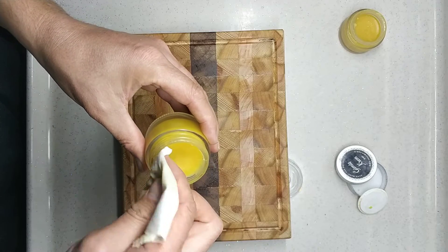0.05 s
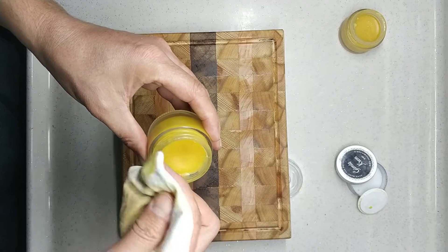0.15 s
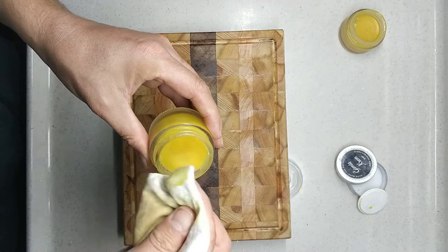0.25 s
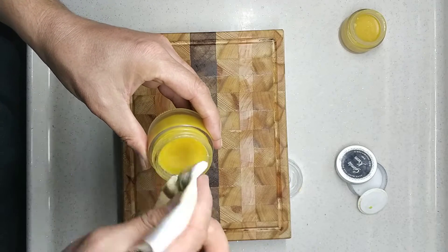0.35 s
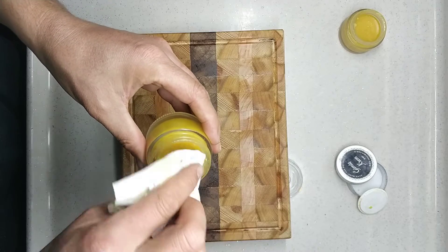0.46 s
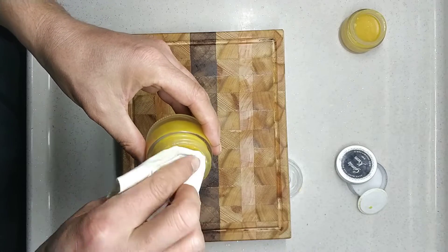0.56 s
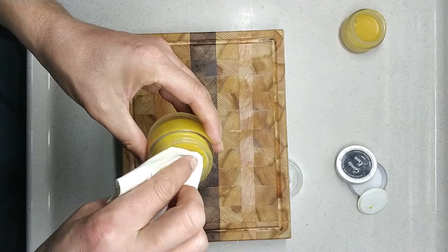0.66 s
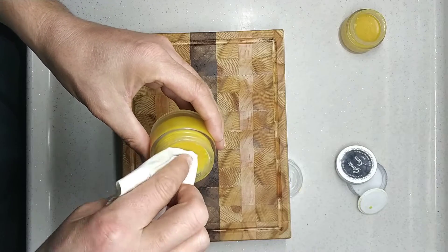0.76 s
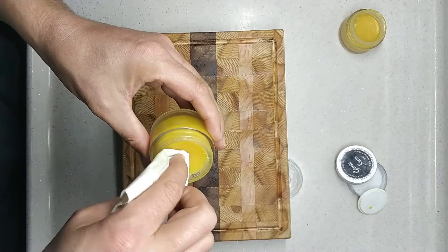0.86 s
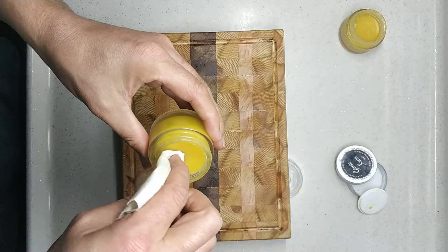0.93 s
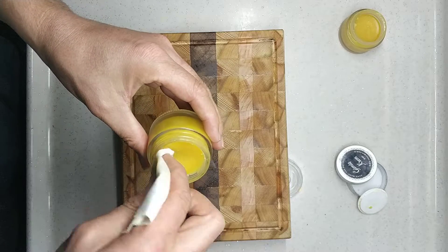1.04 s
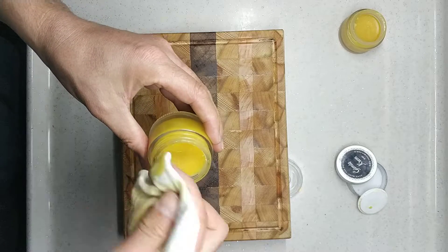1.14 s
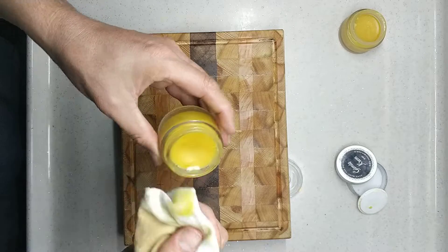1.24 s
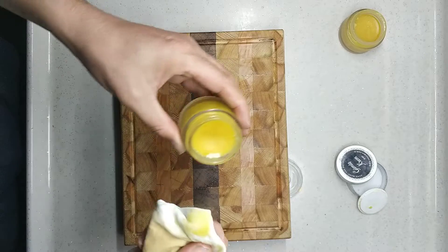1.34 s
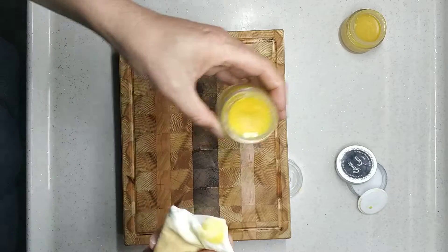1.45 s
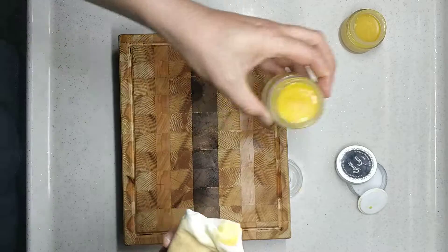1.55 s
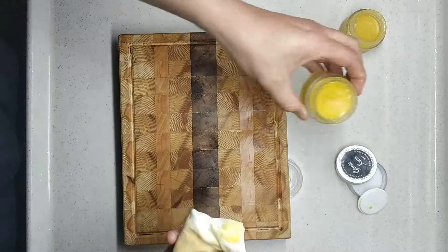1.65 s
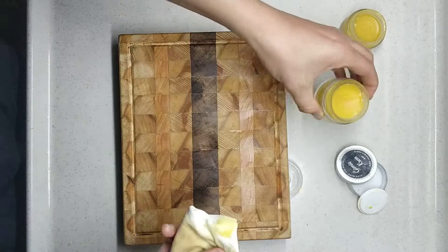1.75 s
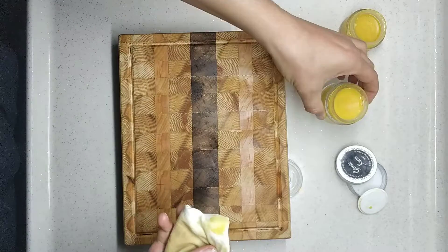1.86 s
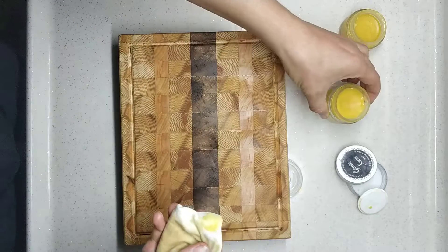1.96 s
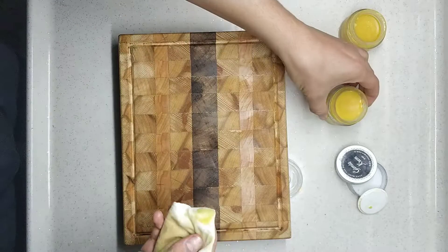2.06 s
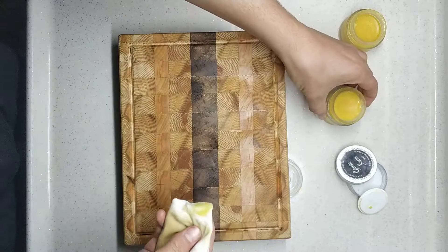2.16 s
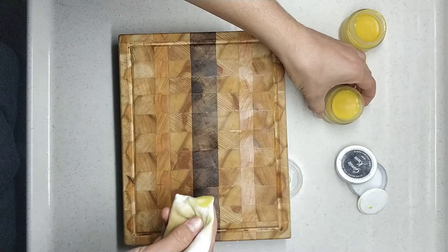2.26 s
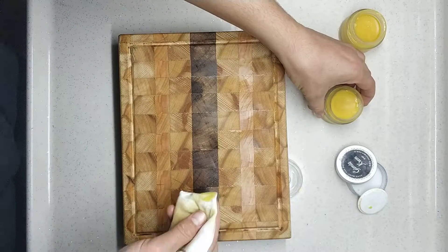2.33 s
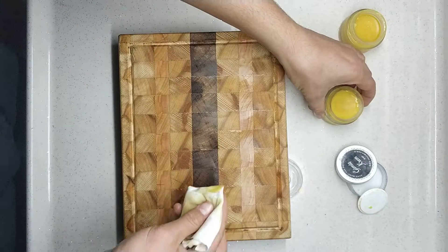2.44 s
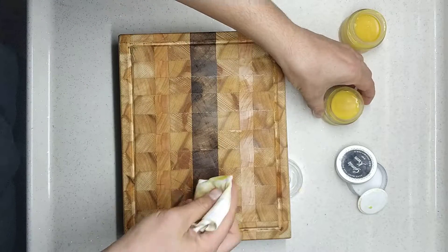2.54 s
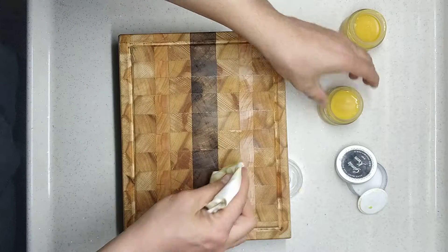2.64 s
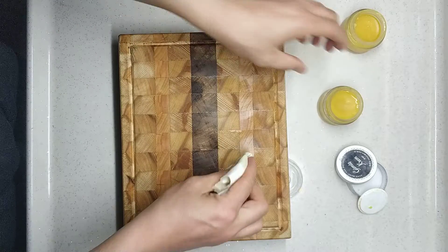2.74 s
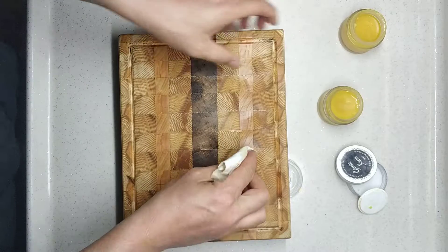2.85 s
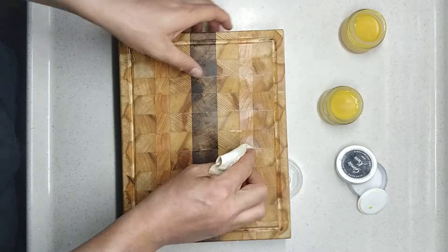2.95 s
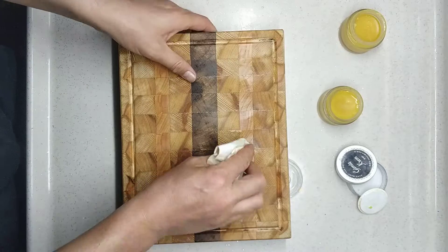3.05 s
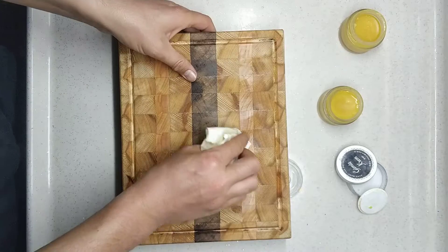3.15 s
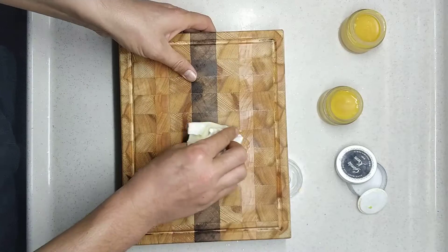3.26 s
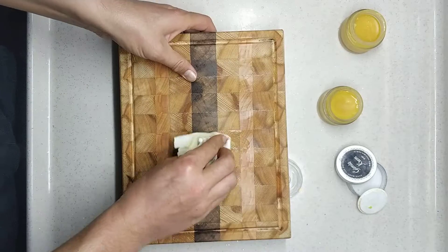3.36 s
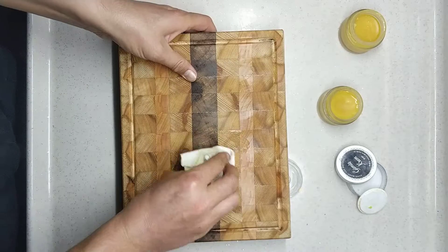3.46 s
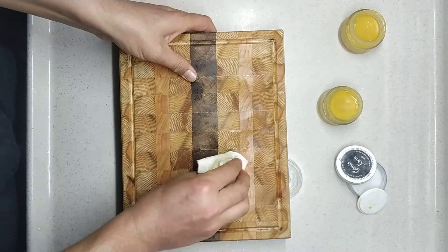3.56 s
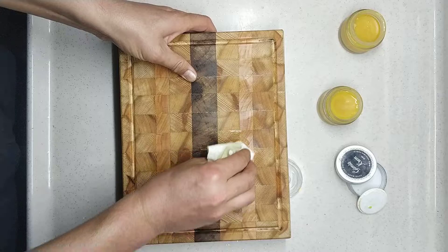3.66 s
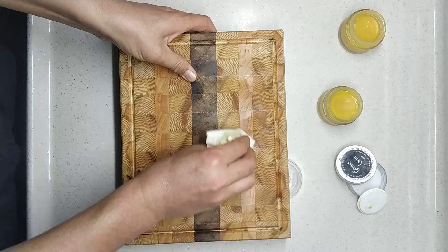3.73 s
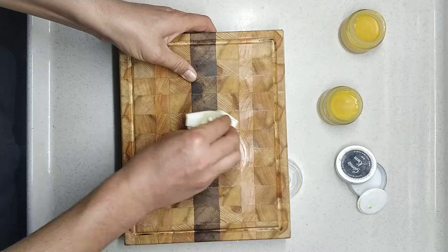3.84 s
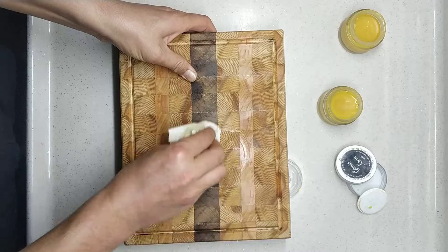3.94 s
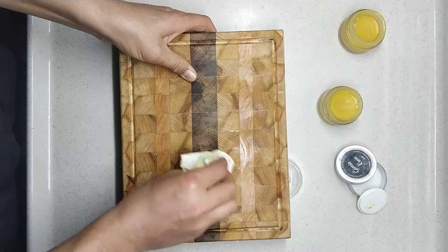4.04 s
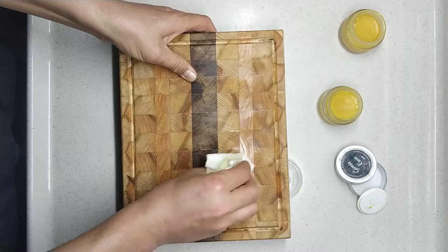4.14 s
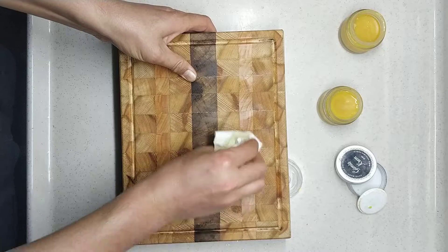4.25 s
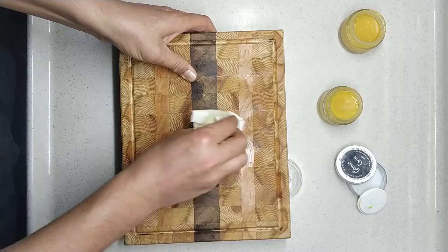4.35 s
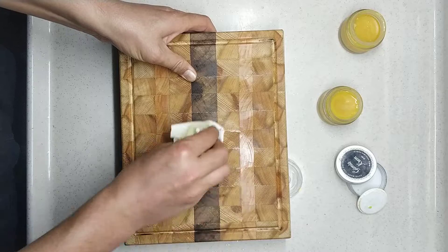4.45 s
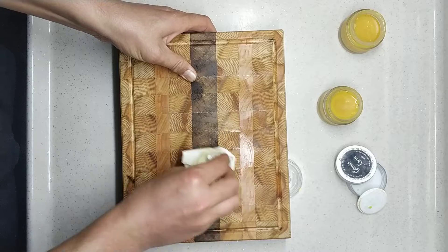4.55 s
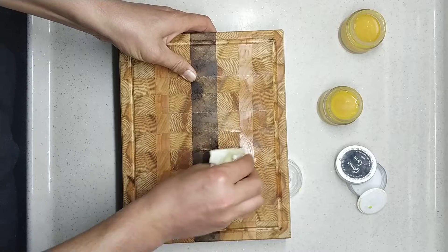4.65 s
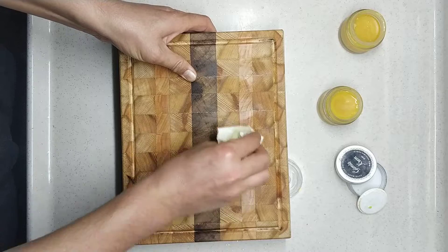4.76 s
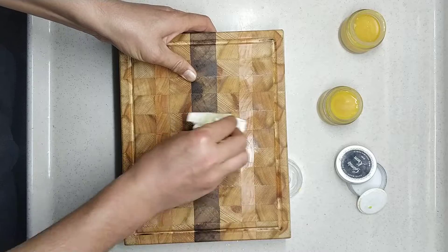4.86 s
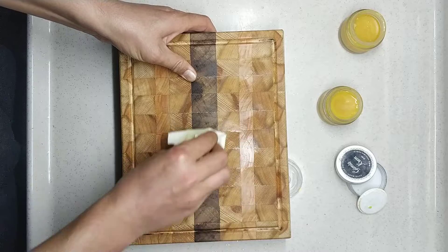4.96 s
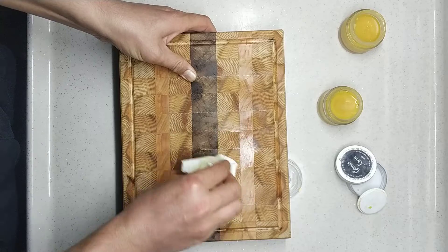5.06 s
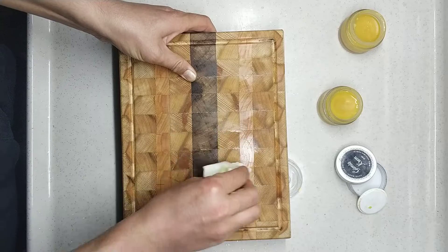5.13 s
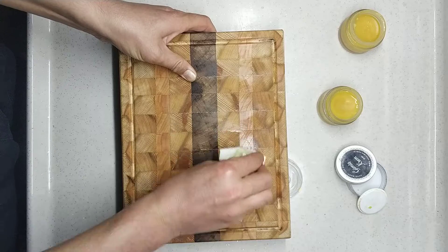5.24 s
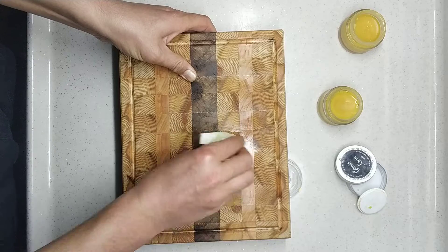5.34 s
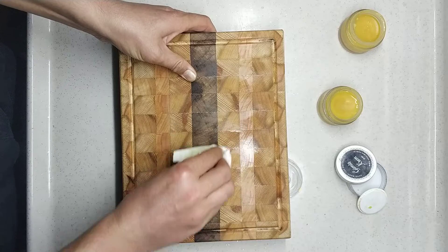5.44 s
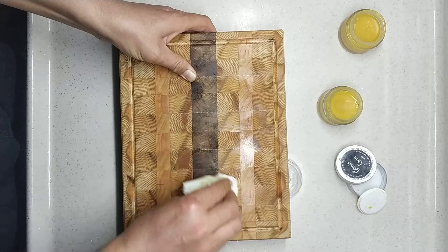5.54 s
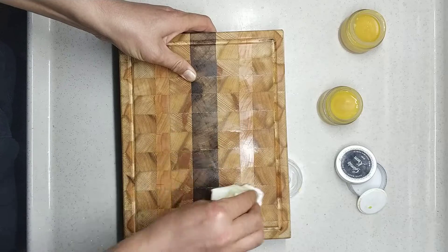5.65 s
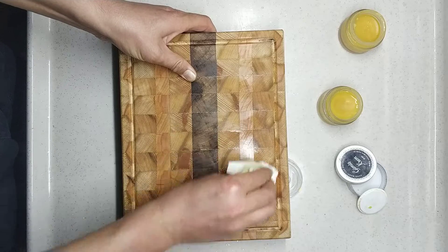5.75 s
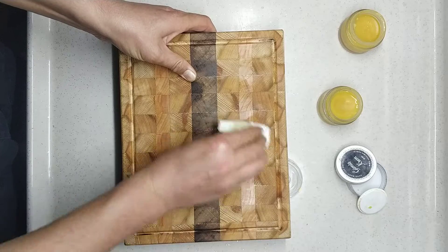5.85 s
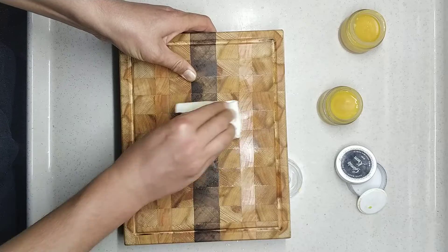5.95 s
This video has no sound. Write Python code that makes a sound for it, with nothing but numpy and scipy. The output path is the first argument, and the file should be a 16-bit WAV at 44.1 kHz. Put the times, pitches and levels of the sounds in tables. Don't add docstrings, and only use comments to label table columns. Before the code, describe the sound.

In a small hard room, a cloth shifts very quietly, then snaps once, bright and dry. A filled glass jar is set on a stone counter with a quick double clunk. A thick wooden board knocks and settles, then cloth strokes hiss quickly to and fro with low judder. A hard wooden knock ends it. Close phone microphone, muffled top treble, nearly mono.

```python
import sys
import numpy as np
from scipy import signal
from scipy.fft import rfft, irfft
from scipy.io import wavfile
from scipy.ndimage import uniform_filter1d

SR = 44100
rng = np.random.default_rng(int(sys.argv[2]) if len(sys.argv) > 2 else 0)


def master(y):
    cut = np.clip(np.atleast_2d(y).T, -1, 1)
    pcm = np.round(cut * 32767)
    wavfile.write(sys.argv[1], SR, pcm.astype(np.int16))


def to_linear_factor(level_db):
    exponent = np.asarray(level_db, float) / 20
    return 10 ** exponent


N = 264600
TIME = np.arange(N) / SR
SLOW = TIME[::64]


def colour(x, points):
    hz, db = np.transpose(points)
    f = np.maximum(np.fft.rfftfreq(x.shape[-1], 1 / SR), 1)
    gain = to_linear_factor(np.interp(np.log(f), np.log(hz), db, left=-90, right=-90))
    return irfft(rfft(x) * gain, x.shape[-1])


def unit(x):
    return x / np.sqrt(np.mean(x ** 2))


def peaks(x, table):
    out = 0
    for k, (hz, width, db) in enumerate(table):
        b, a = signal.iirpeak(hz, hz / width, SR)
        out = out + (-1) ** k * to_linear_factor(db) * signal.lfilter(b, a, x)
    return out


def walk(rate):
    k = int(SR / rate)
    steps = np.repeat(rng.standard_normal(N // k + 1), k)
    return unit(uniform_filter1d(uniform_filter1d(steps, k), k)[:N])


def catches(rate, spread_db):
    on = rng.random(N) < rate / SR
    return unit(on * rng.standard_normal(N) * to_linear_factor(spread_db * rng.exponential(size=N)))


# start in seconds, length in seconds,
# fibre hiss in dB, brightness in dB, board hum in dB.
HANDLING = [(-.1, 0.5, -80.5, -7, -70.5), (.38, .13, -75.5, 1.5, -75.5), (0.567, 0.12, -72, -18, -72),
            (1.01, 0.18, -78, -2.5, -77), (1.244, 0.4, -75.5, -13, -77), (1.55, 0.18, -68.5, -12, -76),
            (1.797, .14, -77.5, -3, -82.5), (2.153, 0.22, -78.5, -15, -76.5),
            (2.543, 0.31, -68.5, -9.5, -63.5), (2.787, 0.24, -73.5, -8, -67.5),
            (2.985, 0.19, -71, -16, -68.5), (3.168, 0.45, -65.5, -2, -68)]
# start in seconds, length in seconds, fibre hiss in dB,
# brightness in dB, board hum in dB.
STROKES = [(3.559, 0.21, -67.5, -11.5, -65), (3.737, 0.21, -60.5, -7.5, -68.5),
           (3.912, 0.29, -58.5, -0.5, -67), (4.282, 0.29, -61, -3, -67.5), (4.444, 0.26, -59.5, -4.5, -66),
           (4.516, 0.088, -61.5, 2.5, -79), (4.613, 0.27, -68, 4, -76), (4.818, 0.21, -59.5, -3.5, -66),
           (4.967, 0.16, -60, -3.5, -72), (5.101, 0.23, -61.5, 0, -66.5), (5.264, 0.15, -65.5, -11, -66.5),
           (5.365, 0.19, -61.5, -0.5, -65.5), (5.484, 0.23, -60, 0, -70.5), (5.736, 0.2, -58, 1, -72.5),
           (5.887, 0.14, -62.5, 4.5, -68)]
START, LENGTH, HISS_DB, BRIGHT_DB, HUM_DB = np.transpose(HANDLING + STROKES)
CONTACT_S, ROUNDNESS = 3.6, 0.7


def swells(db, peak, idle_db, contact_db):
    u = np.clip((SLOW - START[:, None]) / LENGTH[:, None], 0, 1)
    u = u ** (np.log(.5) / np.log(peak))
    shape = np.abs(np.sin(np.pi * u)) ** (2 * ROUNDNESS) * (u < 1)
    power = np.sum(to_linear_factor(2 * db)[:, None] * shape, axis=0)
    touch = np.clip((SLOW - CONTACT_S) / 0.13, 0, 1)
    power = power + to_linear_factor(2 * idle_db) + touch * to_linear_factor(2 * contact_db)
    return np.interp(TIME, SLOW, np.sqrt(power))


def moving_echoes(x, places, ms, depth_db):
    t = TIME[:SR // 20]
    out, power = 0, 0
    for _ in range(places):
        weight = to_linear_factor(depth_db * walk(5))
        echoes = rng.standard_normal(len(t)) * np.exp(-t * 1000 / ms)
        out = out + weight * unit(signal.fftconvolve(x, echoes[None], axes=1)[:, :N])
        power = power + weight ** 2
        x = np.roll(x, SR // 2, axis=1)
    return out / np.sqrt(power)


def patchy(x, depth_db, rate):
    edges = 1200 * 2 ** np.arange(0, 3.4, 1 / 3)
    out = 0
    for lo, hi in zip(edges, edges[1:]):
        out = out + colour(x, [(lo, 0), (hi, 0)]) * to_linear_factor(depth_db * walk(rate))
    return out


# frequency in Hz, level in dB per Hz.
FIBRES = [(1350, -11.5), (2300, -6.5), (2440, -10), (3180, 2), (3740, -2), (4840, -1), (6860, -3),
          (9240, 2), (9920, -3.5), (10800, -26), (14000, -46), (22000, -120)]


def fibre_hiss():
    low = swells(HISS_DB, peak=0.51, idle_db=-80.5, contact_db=-66)
    high = swells(HISS_DB + BRIGHT_DB, peak=0.51, idle_db=-80.5, contact_db=-66)
    slips = np.array([catches(9000, spread_db=2.5), catches(7600, spread_db=3.0)])
    fibres = moving_echoes(colour(slips, FIBRES), 4, ms=12., depth_db=6.)
    fibres = patchy(fibres, depth_db=1.2, rate=14)
    split = signal.butter(4, 6500, fs=SR, output="sos")
    dull = signal.sosfiltfilt(split, fibres)
    bright = unit(fibres - dull) * high * to_linear_factor(1.56 * walk(25))
    return unit(dull) * low * to_linear_factor(1.23 * walk(32)) + bright


# frequency in Hz, width in Hz, level in dB.
HUM = [(572, 23, -19), (670, 52, 8), (920, 39, -3.5), (1600, 25, 6), (2050, 92, 3), (2280, 43, -2.5),
       (3190, 260, 0.5), (4700, 100, -7.5)]


def board_hum():
    grain = catches(5000, spread_db=0.0)
    modes = sum(peaks(grain, [mode]) * to_linear_factor(3 * walk(8)) for mode in HUM)
    broad = colour(grain, [(350, -2.0), (500, -3.5), (2400, -8.5), (3000, -10)])
    hum = unit(unit(modes) + to_linear_factor(1) * unit(broad))
    return hum * swells(HUM_DB, peak=0.34, idle_db=-81, contact_db=-75.5)


# start in seconds, level in dB, hold in seconds, t60 in seconds.
LURCHES = [(-.02, -58, 0.053, 0.53), (.1, -62.5, 0.028, 0.46), (1.2, -78.5, 0.21, .5),
           (1.908, -67, .03, 0.36), (2.712, -70, 0.044, 0.47), (2.914, -67, 0.031, 0.9),
           (3.142, -62.5, 0.066, .8), (3.214, -62.5, .06, .5), (3.5, -54.5, 0.084, 0.18),
           (3.628, -64.5, 0.044, .3), (3.833, -64, 0.028, 0.34), (3.965, -64, .08, 0.33),
           (4.266, -66.5, .15, 0.55), (4.577, -53.5, 0.053, .4), (4.67, -56.5, 0.055, 0.48),
           (4.81, -66.5, 0.045, 0.093), (5.098, -65.5, 0.087, 0.34), (5.32, -63.5, 0.032, 0.72)]


def lurches():
    s, db, hold, t60 = np.transpose(LURCHES)[:, :, None]
    age = SLOW - s
    rise = np.clip(age / 0.013, 0, 1)
    shape = rise * to_linear_factor(db - 60 * np.maximum(age - hold, 0) / t60)
    power = np.interp(TIME, SLOW, np.sum(shape ** 2, axis=0))
    return np.sqrt(power + to_linear_factor(2 * (-82 + 4.2 * walk(5.4))))


# frequency in Hz, width in Hz, level in dB.
FEET = [(164.8, 32, 1), (212, 29.3, 4.5), (241.4, 70.5, -2)]


def judder():
    slips = colour(catches(900, spread_db=1.5), [(40, -33), (90, -16.0), (140, 0), (300, -0.5), (420, -19)])
    return unit(peaks(slips, FEET)) * lurches()


# start in seconds,
# length in seconds, frequency in Hz, level in dB.
STREAKS = [(0, 0.59, 2070, -77), (.092, .11, 670, -75), (0.257, .069, 3200, -71.5),
           (1.243, 0.17, 2050, -76.5), (2.578, 0.32, 2050, -64.5), (2.849, .35, 2050, -70),
           (3.723, 0.23, 3080, -69.5), (3.885, 0.07, 1600, -70.5), (3.95, .19, 2130, -72),
           (4.298, 0.23, 668, -73), (4.349, 0.13, 2050, -72), (4.496, 0.27, 3060, -72),
           (4.821, 0.18, 673, -67), (4.844, 0.15, 1600, -67), (4.874, .18, 2280, -79),
           (5.037, 0.11, 670, -69), (5.105, 0.44, 2050, -67), (5.219, 0.23, 531, -69.5),
           (5.4, 0.18, 4700, -65), (2.577, 0.027, 6100, -65.5), (5.746, 0.13, 1600, -68.5)]
# start in seconds, length in seconds, frequency in Hz,
# width in Hz, level in dB.
SCUFFS = [
    (2.659, .18, 3490, 890, -64),
    (5.561, 0.1, 3200, 400, -65),
]


def streaks():
    out = np.zeros(N + SR)
    mode_hz, mode_width = np.transpose(HUM)[:2]
    sung = [(s, length, hz, 1.78 * np.interp(hz, mode_hz, mode_width), db) for s, length, hz, db in STREAKS]
    for s, length, hz, width, db in sung + SCUFFS:
        noise = rng.standard_normal(SR)[:int(length * SR)]
        mode = [(hz, width, 0)]
        tone = unit(peaks(peaks(noise, mode), mode))
        out[int(s * SR):][:len(tone)] += to_linear_factor(db) * tone * np.hanning(len(tone)) ** .5
    return out[:N]


def rubbing():
    board = board_hum() + judder() + streaks()
    return fibre_hiss() + np.array([board, 0 * board])


# frequency in Hz, level in dB per Hz.
AIR = [(41, -66), (70, -30), (140, -26), (238, -4.5), (281, -3.5), (519, -4), (682, -12.5), (807, -7.5),
       (1580, -13.5), (4180, -14), (7080, -22.5), (9310, -15.5), (10800, -46), (14000, -61), (22000, -120)]
AIR_DB = -69


def air():
    return unit(colour(rng.standard_normal((2, N)), AIR)) * to_linear_factor(AIR_DB - 2.5 + 0.35 * walk(2.3))


def click(points):
    hz, db = np.transpose(points)
    f = np.maximum(np.fft.rfftfreq(2048, 1 / SR), 20)
    cepstrum = irfft(np.interp(np.log(f), np.log(hz), db) * np.log(10) / 20)
    cepstrum[1:1024] *= 2
    pulse = irfft(np.exp(rfft(cepstrum[:1025], 2048)))
    return pulse / np.abs(pulse).max()


def knocks(events, crack, modes, gain_db):
    out, t = np.zeros((2, N + SR)), TIME[:SR // 4]
    hz, db, t60 = np.transpose(modes)[:, :, None]
    vary = rng.standard_normal((len(events), len(modes), 1))
    for (s, peak_db, soft_db, direct_db), v in zip(events, vary):
        decay = to_linear_factor(db + 1.5 * v - 60 * t / t60)
        blow = np.sum(decay * np.sin(2 * np.pi * hz * t), axis=0)
        blow[:2048] += click([(f, d - soft_db * np.log2(f / 1000)) for f, d in crack])
        at = int(s * SR)
        out[:, at:at + len(t)] += to_linear_factor(peak_db + gain_db + np.array([[0], [direct_db]])) * blow
    return out[:, :N]


def long_rings(events, modes):
    out, t = np.zeros(N + SR), TIME[:SR]
    hz, db, t60 = np.transpose(modes)[:, :, None]
    vary = rng.standard_normal((len(events), 2, len(modes), 1))
    for (s, peak_db, *_), (size, phase) in zip(events, vary):
        decay = to_linear_factor(db + 2 * size - 60 * t / t60)
        ring = np.sum(decay * np.sin(2 * np.pi * hz * t + 3 * phase), axis=0)
        out[int(s * SR):][:SR] += to_linear_factor(peak_db + 21.0) * ring * (1 - np.exp(-t / 0.0029))
    return np.array([out[:N], 0 * TIME])


# frequency in Hz, t60 in seconds.
ROOM_T60 = [(150, 0.31), (400, 0.6), (1000, 0.53), (2800, 0.52), (7000, 0.57), (10000, 0.43)]
NEAR_MS, FAR_MS, FAR_DB = 13, 16.5, -4.5


def room(t60_scale):
    t = TIME[:SR]
    ms = t * 1000
    hz, t60 = np.transpose(ROOM_T60)
    tail = 0
    for centre in 100 * 2 ** np.arange(0, 7.5, .5):
        edges = [centre / 2 ** .25, centre * 2 ** .25]
        sos = signal.butter(2, edges, "band", fs=SR, output="sos")
        band = signal.sosfilt(sos, rng.standard_normal((2, SR)))
        band_t60 = t60_scale * np.interp(np.log(centre), np.log(hz), t60)
        tail = tail + band * to_linear_factor(-60 * t / band_t60)
    near = np.clip(ms / 0.46, 0, 1) / (1 + (ms / NEAR_MS) ** 8)
    far = to_linear_factor(FAR_DB) / (1 + np.exp(np.clip(FAR_MS - ms, -30, 30)))
    response = tail * (near + far)
    return response / np.sqrt(np.sum(response[0] ** 2))


def in_room(blows, t60_scale):
    wet = signal.fftconvolve(blows[:1], room(t60_scale), axes=1)[:, :N]
    wet = signal.sosfilt(signal.butter(4, 132, "high", fs=SR, output="sos"), wet)
    both = wet + np.array([blows[1], 0 * blows[1]])
    return signal.sosfilt(signal.butter(3, 120, "high", fs=SR, output="sos"), both)


# start in seconds, peak in dB, softness in dB per octave, direct share in dB.
SNAPS = [
    (0.5994, -77, 1.1, -16),
    (1.1122, -37.5, 0.6, -17),
    (1.5913, -70, 6, -16),
    (3.058, -66, -3, -15),
]
# frequency in Hz, level in dB per Hz.
SNAP_CRACK = [(880, -37), (1500, -23), (1710, -31), (1770, -30), (2270, -18.5), (7140, -7), (8350, -1.5),
              (9610, -3), (10800, -26), (14000, -50), (22000, -120)]
# frequency in Hz, level in dB, t60 in seconds.
SNAP_MODES = [(3200, -18, 0.0072)]


def cloth_snaps():
    return in_room(knocks(SNAPS, SNAP_CRACK, SNAP_MODES, gain_db=13), 0.59)


# start in seconds, peak in dB, softness in dB per octave, direct share in dB.
JAR_HITS = [
    (2.308, -23.5, 1, -14),
    (2.442, -31, -0.46, -33),
    (2.448, -36, 0.37, 2),
    (2.454, -24, -0.46, -28),
]
# frequency in Hz, level in dB per Hz.
JAR_CRACK = [(76, -41), (150, -1.5), (290, -30), (380, -5), (700, -4.5), (914, -0.5), (1080, -5.5),
             (1300, -5), (2030, 1), (2700, -6.5), (3450, -11), (3900, -25), (5300, -28.5), (6500, -36.5),
             (11000, -78)]
# frequency in Hz, level in dB, t60 in seconds.
JAR_MODES = [(390, -21.5, 0.031), (727, -24, 0.056), (930, -14, 0.03), (1320, -17, 0.039),
             (1610, -15.5, 0.066), (1895, -17.5, 0.045)]
# frequency in Hz, level in dB, t60 in seconds.
JAR_RINGS = [(369, -43.5, 0.42), (402, -43.5, 0.28), (525, -49, 0.64), (703, -38.5, 0.45), (921, -29.5, 0.2),
             (1302, -38, 0.21), (1573, -40, 0.13), (1843, -40, .2), (1993, -36, 0.21), (2090, -39, 0.17),
             (2215, -33, 0.17)]


def jar_bounce():
    jar = knocks(JAR_HITS, JAR_CRACK, JAR_MODES, gain_db=7)
    return in_room(jar, 0.85) + long_rings(JAR_HITS, JAR_RINGS)


# start in seconds, peak in dB, softness in dB per octave, direct share in dB.
TAPS = [
    (3.149, -48.5, 0.5, 0),
    (3.299, -62, .4, -2),
    (5.983, -36, .4, -11),
    (5.989, -22, .4, -2),
]
# frequency in Hz, level in dB per Hz.
TAP_CRACK = [(150, -30), (400, -17.5), (650, 6), (850, -25), (1400, -20), (8000, -46)]
# frequency in Hz, level in dB, t60 in seconds.
TAP_MODES = [(585, -19, .04), (670, -13, 0.021)]
# start in seconds, peak in dB, softness in dB per octave, direct share in dB.
BOARD_HITS = [
    (3.393, -24, 0.7, -11.5),
    (3.494, -39, 3.5, -4),
    (3.543, -52.5, 4.5, 4),
    (5.9893, -18, -0.5, -18),
]
# frequency in Hz, level in dB per Hz.
BOARD_CRACK = [(76, -65.5), (140, -28.5), (215, 4), (350, -25), (450, -7), (600, -2), (690, -0.5),
               (950, -7), (1110, -22), (1300, -9), (1500, -18.5), (2330, -12), (7050, -22), (11000, -45.5)]
# frequency in Hz, level in dB, t60 in seconds.
BOARD_MODES = [(160, -38, .08), (205, -38, 0.065), (483, -30.5, 0.075), (558, -25.5, 0.071),
               (684, -17.5, 0.039), (1320, -26.5, 0.03), (2270, -57, 0.077)]
# frequency in Hz, level in dB, t60 in seconds.
BOARD_RINGS = [(163.2, -40, 0.47), (204.2, -32, 0.35), (471, -42.5, 0.31), (547, -36.5, 0.29),
               (688, -33.5, 0.22), (747, -47, 0.18), (856, -36.5, 0.14)]


def board_knocks():
    board = knocks(BOARD_HITS, BOARD_CRACK, BOARD_MODES, gain_db=10.0)
    taps = knocks(TAPS, TAP_CRACK, TAP_MODES, gain_db=-2.0)
    return in_room(board + taps, 0.68) + long_rings(BOARD_HITS, BOARD_RINGS)


# low edge in Hz, high edge in Hz, share of time from 0 to 1,
# side minus mid in dB.
WIDTH = [(4160, 4140, .07, -6), (5020, 5600, .08, -12), (5570, 6200, .2, -8.5), (6100, 6900, 0, 5),
         (7020, 7600, .35, -3.5), (7600, 8300, 0.3, -5.5), (8030, 9240, 0.3, -6), (9000, 9800, 0.5, -9),
         (9800, 8700, 0, -8)]
FRAME, GRID = 1024, 496


def flicker(side):
    out, frames = 0, N // FRAME + 2
    luck = rng.random((len(WIDTH), frames)) + .5 * (rng.random(frames) - .5)
    for (lo, hi, share, db), now, above in zip(WIDTH, luck, np.roll(luck, -1, axis=0)):
        on = np.minimum(now, above + .12) < share
        gate = uniform_filter1d(np.repeat(1. * on, FRAME), FRAME // 2)[FRAME - GRID:][:N]
        out = out + gate * colour(side, [(lo, db), (hi, db)])
    return out


def scene():
    near = rubbing() + cloth_snaps() + jar_bounce() + board_knocks()
    loud = uniform_filter1d(near[0] ** 2, SR // 8) / to_linear_factor(2 * AIR_DB)
    mid, side = near + air() * (1 + np.abs(loud)) ** -.2
    side = flicker(side)
    return np.array([mid + side, mid - side])


def top_cut(x):
    return signal.sosfilt(signal.butter(12, 10940, fs=SR, output="sos"), x)


def record(dry):
    low_pass = signal.ellip(8, .2, 60, 10900, fs=SR, output="sos")
    return top_cut(signal.sosfilt(low_pass, dry))


dry = scene()
out = record(dry)
master(out)
```